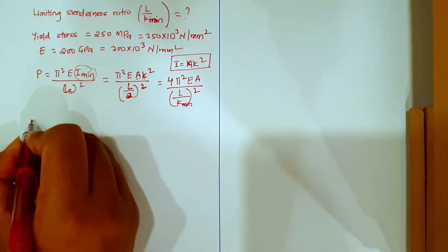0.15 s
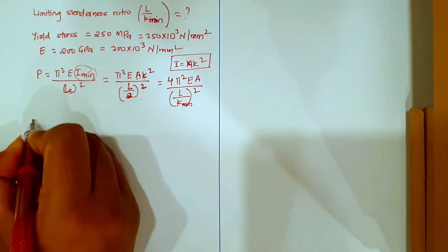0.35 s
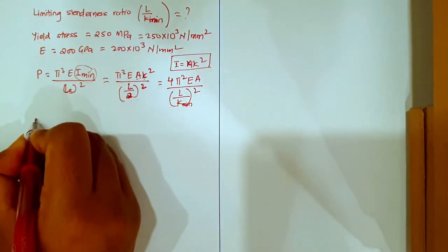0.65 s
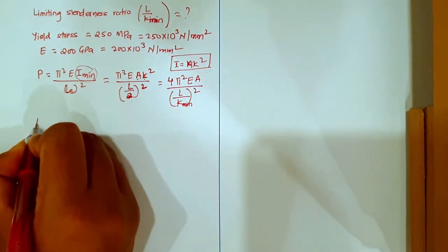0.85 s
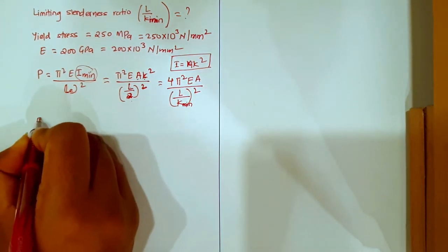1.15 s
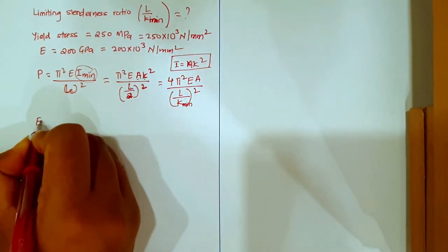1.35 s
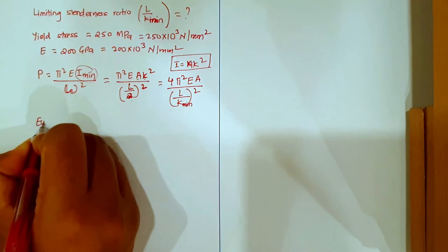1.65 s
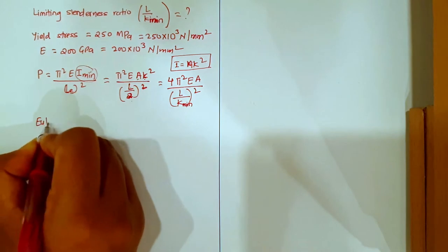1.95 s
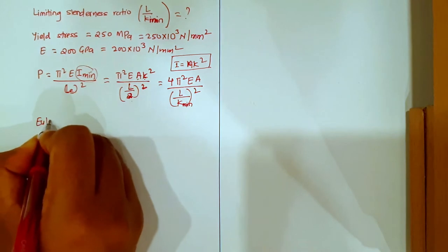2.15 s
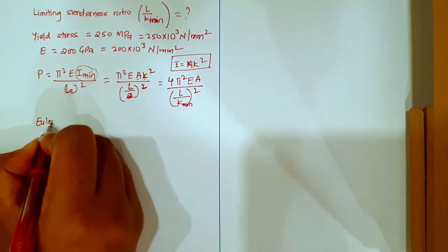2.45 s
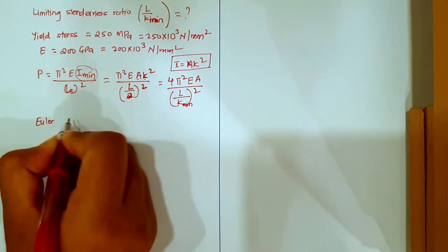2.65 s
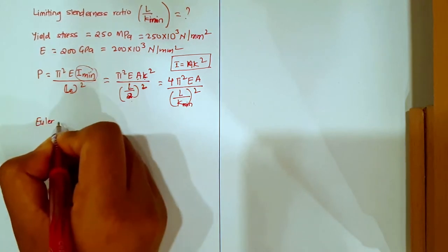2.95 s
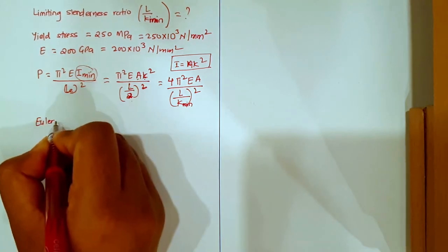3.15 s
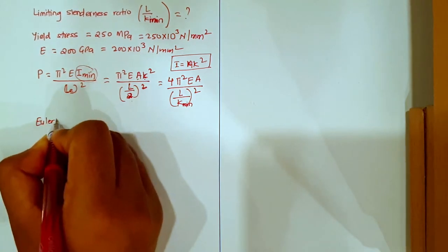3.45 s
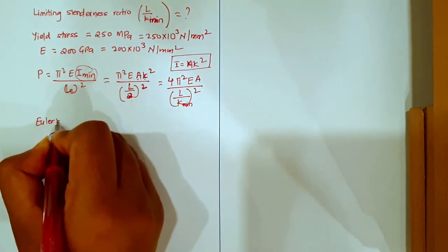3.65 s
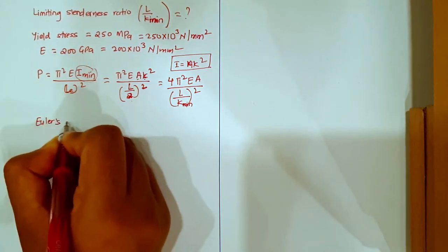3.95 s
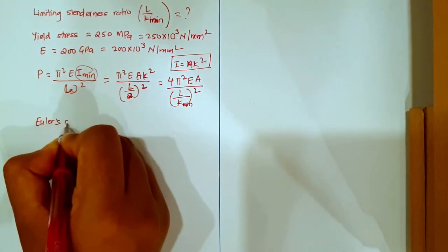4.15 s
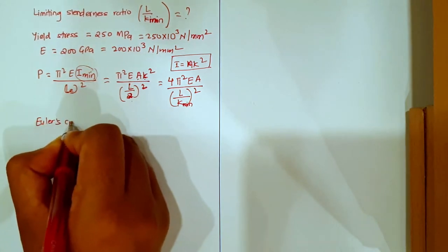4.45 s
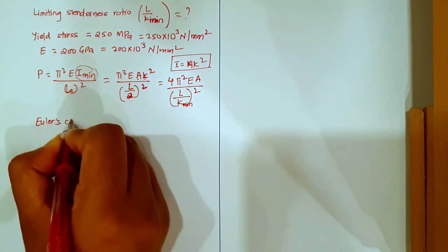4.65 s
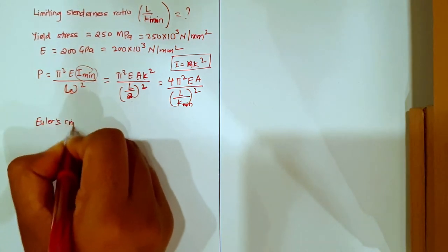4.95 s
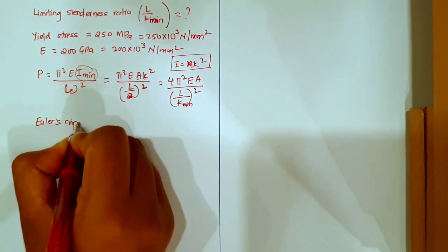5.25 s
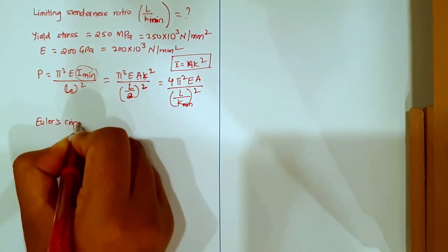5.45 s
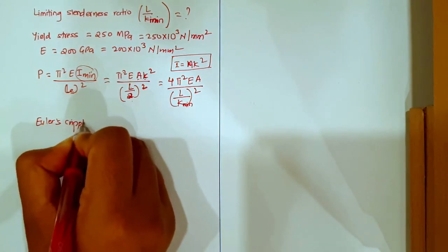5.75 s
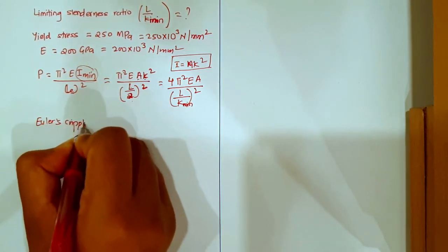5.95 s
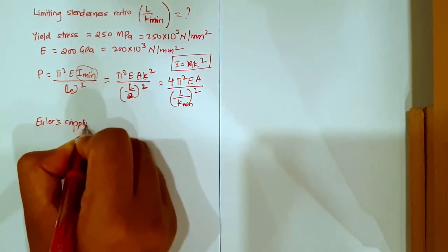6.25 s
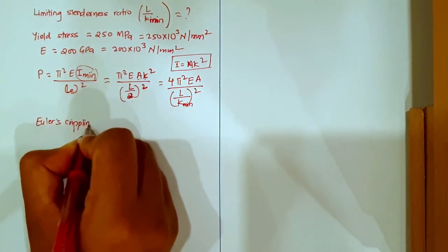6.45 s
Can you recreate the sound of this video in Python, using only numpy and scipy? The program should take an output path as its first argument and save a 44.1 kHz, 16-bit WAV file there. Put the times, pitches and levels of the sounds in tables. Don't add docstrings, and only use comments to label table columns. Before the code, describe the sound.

A ball pen taps and scratches short letters on a paper pad over a low, wavering fan hum in a quiet room.

```python
import sys
import numpy as np
from scipy import signal
from scipy.fft import rfft, irfft
from scipy.io import wavfile

SR = 44100
rng = np.random.default_rng(int(sys.argv[2]) if len(sys.argv) > 2 else 0)


def magnitude_from_level(level_db):
    exponent = np.asarray(level_db, float) / 20
    return 10 ** exponent


def store_wav(level_fs):
    pcm = np.round(np.clip(np.atleast_2d(level_fs), -1, 1) * 32767)
    wavfile.write(sys.argv[1], SR, pcm.T.astype(np.int16))


N = 291060


def rms_one(x):
    return x / np.sqrt(np.mean(x ** 2) + 1e-20)


def in_time(rows):
    s, *columns = np.transpose(rows)
    return [np.interp(np.arange(N) / SR, s, c) for c in columns]


def over_hz(rows):
    hz, *columns = np.transpose(rows)
    grid_hz = np.arange(N // 2 + 1) * SR / N
    return [np.interp(np.log(grid_hz + 1), np.log(hz), c) for c in columns]


def drift(rate_hz):
    r = np.exp(-80 * np.pi * rate_hz / SR)
    noise = rng.standard_normal(N // 40 + 2002)
    slow = signal.lfilter([1], [1, -2 * r, r * r], noise)[2000:]
    return np.interp(np.arange(N) / 40, np.arange(len(slow)), rms_one(slow))


def resonate(x, hz, width_hz):
    r = np.exp(-np.pi * width_hz / SR)
    zeros = np.array([1, 0, -1]) * (1 - r * r) / 2
    poles = [1, -2 * r * np.cos(2 * np.pi * hz / SR), r * r]
    return signal.lfilter(zeros, poles, x + 1e-18)


def lagged(pair, lag_s=0.0002977):
    late = np.interp(np.arange(N) - lag_s * SR, np.arange(N), pair[1])
    return np.array([pair[0], late])


def tone(hz, wander_hz, flutter_db):
    phase = 2 * np.pi * np.cumsum(hz + wander_hz * drift(2.584)) / SR
    return rms_one(np.sin(phase) * magnitude_from_level(flutter_db * drift(2.0)))


def swells(s, half_s, db):
    t = np.arange(0, N / SR + .002, .002)
    distance = (t - np.c_[s]) / np.c_[half_s]
    bells = magnitude_from_level(np.c_[db] - 12 * np.minimum(distance ** 2, 20)).sum(axis=0)
    return np.interp(np.arange(N) / SR, t, bells)


# frequency in Hz, left and right level in dB per Hz,
# likeness of the two ports [0-1].
ROOM_FLOOR = [(31.2, -19, -28, 0.2), (83.8, 14, 12, 0.63), (210, -6.5, -5, 1), (300, -5.5, -17, 1),
              (426, -17, -15.5, 1), (640, -24.5, -29.5, 1), (910, -23.5, -23.5, 0), (1130, -49, -36, 0.1),
              (2500, -35.5, -42, 0), (5100, -41.5, -38.5, 0), (7700, -49.5, -56, 0), (11180, -38, -38, 0.1),
              (14400, -39.5, -38.5, 0.7)]


def room_noise():
    left_db, right_db, alike = over_hz(ROOM_FLOOR)
    alike = np.clip(alike, 0, 1)
    mid, side = rfft(rng.standard_normal((2, N)))
    pair = np.sqrt(1 + alike) * mid + np.sqrt(1 - alike) * side * [[1], [-1]]
    noise = rms_one(irfft(pair * magnitude_from_level([left_db, right_db]), N))
    return magnitude_from_level(13.5) * lagged(noise)


# frequency in Hz, level in dB per Hz.
AIR_WHISTLE = [(800, -55), (1100, -20), (1300, -13.5), (1550, -6.5), (1780, -2), (2000, -7), (2200, -14),
               (2400, -22.5), (2900, -47)]


def air_stream():
    colour = magnitude_from_level(over_hz([(400, -44)] + AIR_WHISTLE + [(5000, -64)])[0])
    whoosh = rms_one(irfft(rfft(rng.standard_normal(N)) * colour, N))
    return whoosh * magnitude_from_level(.6 * drift(15)) * magnitude_from_level([[-35], [7]])


BUZZ_HZ = 99.95
# time in seconds, beats gone by.
FAN_SLIP = [(-.295, -1), (2.99, 8), (4.14, 11), (6.86, 19)]
# time in seconds, level in dB.
SECOND_ORDER = [(0, -41), (.8, -43), (1.6, -48), (2.7, -37.5), (3.4, -41), (4.0, -53.5), (4.6, -54),
                (5.2, -40), (5.9, -49), (6.6, -58)]


def beating(gain):
    turns, beats = BUZZ_HZ * np.arange(N) / SR, in_time(FAN_SLIP)[0]
    buzz, second, side = [np.sqrt(2) * np.sin(2 * np.pi * (turns - k * beats)) for k in range(3)]
    level = magnitude_from_level(in_time(SECOND_ORDER)[0] + 2.7 * drift(3.3))
    buzz_level = gain * magnitude_from_level(12.5 + 1.5 * drift(3.5))
    return buzz_level * buzz + level * (second + magnitude_from_level(-12) * side)


# multiple of the buzz, multiple of the fan turn, dB over the air stream.
MOTOR_TONES = [(0, 3, -2), (1, 1, 0), (0, 4, 2), (2, 0, 2), (1, 3, -1), (0, 6, 1), (1, 4, -9)]
# time in seconds, level in dB.
SIXTH_ORDER = [(0, -1), (.9, 1), (1.1, -16), (1.35, -2), (2.9, 1.5), (4.3, 1), (4.65, -13.5), (5.05, 6),
               (5.8, -3), (6.6, 1.5)]


def motor(gain):
    turns = BUZZ_HZ * np.arange(N) / SR
    fan = (turns - in_time(FAN_SLIP)[0]) / 2
    out = 0
    for buzz_multiple, fan_multiple, db in MOTOR_TONES:
        level_db = db + 2.5 * drift(3.0)
        if fan_multiple == 6:
            level_db = level_db + in_time(SIXTH_ORDER)[0]
        cycles = buzz_multiple * turns + fan_multiple * fan + rng.random()
        out = out + magnitude_from_level(level_db) * np.sin(2 * np.pi * cycles)
    return gain * magnitude_from_level(-0.5) * np.sqrt(2) * out


# middle and half length in seconds, level in dB.
CASE_BOOMS = [(.5, .15, -55), (0.846, 0.18, -43.5), (1.427, 0.2, -38), (1.71, .12, -39),
              (2.004, 0.088, -32), (2.493, 0.31, -42), (2.87, 0.13, -41.5), (3.354, 0.11, -35.5),
              (3.917, 0.33, -38), (4.355, 0.17, -38), (4.88, 0.071, -37), (5.155, 0.082, -53),
              (5.56, 0.36, -40.5), (5.967, 0.13, -36.5), (6.457, 0.17, -36)]
# middle and half length in seconds, level in dB.
THIRD_ORDER = [(0.19, 0.11, -49), (0.713, 0.18, -53), (1.35, 0.22, -57), (1.95, 0.053, -42),
               (2.856, .14, -41), (3.565, 0.049, -44), (3.932, 0.11, -42), (4.317, 0.094, -46),
               (4.61, 0.058, -52), (4.905, 0.033, -44.5), (5.168, .09, -48.5), (5.77, 0.12, -45),
               (6.52, 0.099, -52)]
# time in seconds, level in dB.
DESK_HUM_LEVEL = [(0.0, -61), (0.15, -54), (2.13, -45.5), (2.79, -46), (2.87, -59), (2.96, -47),
                  (3.46, -62), (3.55, -50), (4.34, -46.5), (5.29, -46), (6.54, -43.5), (6.6, -39)]
# frequency and wander width in Hz, level in dB over the air stream.
UPPER_ORDERS = [(125.2, 17, -3.5), (194.9, 10, 3.5), (244.7, 9, 0), (287.4, 4.4, -2.5), (340.7, 6.6, -10)]


def hum(gain):
    fan_hz, boom_hz = 48.99, 76.43
    boom = swells(*np.transpose(CASE_BOOMS)) + gain * magnitude_from_level(2.5)
    third = swells(*np.transpose(THIRD_ORDER)) + gain * magnitude_from_level(0.5)
    out = boom * tone(boom_hz, wander_hz=2.497, flutter_db=6.5)
    out += beating(gain)
    out += third * tone(3 * fan_hz, wander_hz=2.32, flutter_db=4.0)
    for hz, width_hz, level_db in UPPER_ORDERS:
        out += gain * magnitude_from_level(level_db) * rms_one(resonate(rng.standard_normal(N), hz, width_hz))
    out += motor(gain)
    first = magnitude_from_level(in_time(DESK_HUM_LEVEL)[0]) * tone(fan_hz, wander_hz=0.38, flutter_db=1.5)
    return lagged(out * magnitude_from_level([[.4], [-.4]])) + lagged(first * magnitude_from_level([[-.6], [2.1]]), lag_s=0.0022)


# frequency and width in Hz, left and right level in dB.
DESK_MODES = [(399.4, 106, -1.5, -8.5), (533.5, 72, -2.5, 1), (590.6, 51.5, -0.5, -0.5),
              (662, 67, -9.5, -0.5), (725.5, 72, -9.5, -6), (834, 91, -8, -11), (1060, 147, -24.5, -12),
              (1280, 130, -22, -4.5), (1550, 270, -49, -6.5), (2143, 172, -46, -7), (2140, 630, -29, -12),
              (3460, 310, -40.5, -23)]


def desk(low, middle, upper, damping, sign, patchy_db=0):
    out = 0
    for k, (hz, width_hz, left_db, right_db) in enumerate(DESK_MODES):
        drive = low if hz < 620 else middle if hz < 1150 else upper
        drive = drive * magnitude_from_level(patchy_db * drift(9))
        ring = sign ** k * resonate(drive, hz, width_hz * damping)
        out = out + ring * magnitude_from_level([[left_db], [right_db]])
    return lagged(out, lag_s=0.00017)


# time in seconds, peak in dB, hardness in dB.
NIB_TAPS = [(0.84, -31.5, 7.5), (1.22, -34.5, 9.5), (1.397, -34, 2.5), (1.506, -44, 2), (1.602, -39.5, -4),
            (1.6915, -35, 5), (1.926, -24.5, 6), (2.143, -27.5, 3.5), (2.436, -37, 1), (2.704, -52, 18),
            (3.511, -24.5, 4.5), (3.696, -30.5, 0), (4.151, -35.5, -3), (4.351, -29.5, -9), (4.514, -38, 0),
            (4.759, -30, 2.5), (4.898, -25, 2.5), (4.9805, -30.5, -18), (5.116, -28.5, -7),
            (5.348, -25.5, -14), (5.554, -27, -4), (5.807, -25, 2.5), (6.016, -27.5, -14), (6.194, -26, -2),
            (6.312, -30.5, -7), (6.431, -39, 0)]


def taps():
    s, peak_db, hard_db = np.transpose(NIB_TAPS)
    at = np.round(s * SR).astype(int)
    blows, ticks = np.zeros(N), np.zeros(N)
    blows[at], ticks[at] = magnitude_from_level(peak_db), magnitude_from_level(peak_db + hard_db)
    ms = np.arange(290) / SR * 1000
    crest = np.exp(-((ms - 2.05) / .33) ** 2)
    crest -= .35 * np.exp(-((ms - 2.9) / .35) ** 2)
    crest -= .28 * np.exp(-((ms - 4.6) / .8) ** 2)
    dip = -.5 * np.exp(-((ms - 1.4) / 0.18) ** 2)
    pulse, sharp = signal.lfilter(crest, [1], blows), signal.lfilter(dip, [1], ticks)
    pulse = signal.sosfilt(signal.butter(1, 180, "high", fs=SR, output="sos"), pulse)
    direct = magnitude_from_level(1.0) * lagged((pulse + sharp) * magnitude_from_level([[.2], [-.2]]), lag_s=0.00023)
    return direct + magnitude_from_level(3.5) * desk(pulse, pulse, magnitude_from_level(16) * sharp, damping=0.94, sign=0.87)


def skids(hard_share):
    s, peak_db, hard_db = np.transpose(NIB_TAPS)
    starts = np.zeros(N)
    starts[(s * SR).astype(int)] = magnitude_from_level(peak_db + hard_share * hard_db)
    fade_db_per_s = 203
    return signal.lfilter([1], [1, -magnitude_from_level(-fade_db_per_s / SR)], starts + 1e-18)


def nib_down(lift_s, bite_s):
    t, share = np.arange(N) / SR, np.ones(N)
    for s, peak_db, _ in NIB_TAPS:
        near = slice(int((s - .08) * SR), int((s + .05) * SR))
        depth = np.clip((peak_db + 27.5) / 10, 0, 1)
        corners_s = [-2 * lift_s, -lift_s, .002, 0.00067 + bite_s]
        share[near] *= 1 - depth * np.interp(t[near] - s, corners_s, [0, 1, 1, 0])
    return share


# middle and half length in seconds, pressure in dB, speed as hiss in dB.
PEN_STROKES = [(0.975, 0.051, -51.5, -64.5), (1.086, 0.045, -64, -68.5), (1.598, .035, -59, -66.5),
               (1.687, 0.04, -51.5, -67), (1.772, 0.13, -61, -74.5), (2.028, 0.059, -49, -62),
               (2.313, 0.12, -60.5, -73), (2.432, 0.1, -54, -72), (2.611, 0.058, -53, -67.5),
               (3.562, .06, -65, -80), (3.8, 0.054, -64, -76), (3.934, 0.031, -53, -80),
               (4.04, .05, -66, -69.5), (4.24, 0.082, -55, -70), (4.429, 0.036, -51, -67),
               (4.526, 0.034, -48, -65), (4.638, 0.04, -55.5, -72), (4.782, .04, -70, -74.5),
               (4.944, 0.049, -45, -72), (4.988, .033, -36, -52.5), (5.052, .025, -54, -67.5),
               (5.199, 0.091, -54.5, -65.5), (5.443, 0.048, -37, -58), (5.673, 0.11, -61.5, -69),
               (5.902, 0.043, -43.5, -63), (6.08, 0.046, -54.5, -75), (6.198, 0.023, -47.5, -69),
               (6.348, 0.03, -65, -69), (6.454, 0.029, -41.5, -62.5), (6.59, 0.09, -54.5, -68.5)]
# middle and half length in seconds, hiss in dB.
HAND_SLIDES = [(.826, 0.0034, -66), (0.999, .006, -65), (1.27, 0.032, -78), (1.455, 0.024, -77),
               (1.697, .003, -59), (1.925, .006, -69), (2.763, 0.063, -58), (2.915, 0.057, -54),
               (3.513, .003, -71), (3.907, 0.03, -64.5), (4.772, 0.0052, -70)]
# time in seconds, share [0-1].
HAND_ON_PAD = [
    (.75, 0),
    (.85, 1),
    (2.95, 1),
    (3.02, 0),
    (3.46, 0),
    (3.52, 1),
]


def contact():
    s, half_s, press_db, speed_db = np.transpose(PEN_STROKES)
    rest = magnitude_from_level([[-73], [-71], [-82.5], [-82]]) * in_time(HAND_ON_PAD)[0]
    early, short_s = s - 0.27 * half_s, 0.87 * half_s
    drag_db = -53 + 0.75 * (press_db + 44.5)
    scratch_db = -16 + 0.4 * speed_db + 0.6 * press_db
    low = swells(early, short_s, press_db) + magnitude_from_level(-20) * skids(0)
    middle = swells(early, short_s, drag_db) + magnitude_from_level(-21) * skids(0.54)
    upper = swells(s, half_s, scratch_db) + magnitude_from_level(-46) * skids(0)
    hiss = swells(s, half_s, speed_db) + swells(*np.transpose(HAND_SLIDES))
    return rest + [low, middle, upper, hiss]


def fibres(per_s, spread_db):
    strength = magnitude_from_level(spread_db * np.minimum(rng.exponential(1, N), 4))
    catches = rng.random(N) < per_s / SR
    return rms_one(strength * rng.choice([-1, 1], N) * catches)


# frequency in Hz, left and right level in dB per Hz.
PAPER_HISS = [(1500, -3.5, -5), (2800, -1.5, -3), (4300, -13, -5), (5370, -1, -4), (7170, 0.5, -31),
              (8850, -2.5, -43), (10000, 0.5, -28), (14600, -4, -17)]


def strokes():
    low, middle, upper, brush = contact()
    down = nib_down(lift_s=0.044, bite_s=0.0023)
    slips = fibres(per_s=2200, spread_db=3.5) * magnitude_from_level(1.2 * drift(60)) * down
    scratch = fibres(per_s=3000, spread_db=3.5) * upper * magnitude_from_level(18.5 + 2.2 * drift(35)) * down
    drag = magnitude_from_level(21.5) * desk(slips * low, slips * middle * magnitude_from_level(4.5), scratch,
                            damping=0.65, sign=-1.0187, patchy_db=3.05)
    drag = signal.sosfilt(signal.butter(3, 3300, fs=SR, output="sos"), drag)
    grains = rfft([fibres(per_s=9800, spread_db=1.0), fibres(per_s=11000, spread_db=4.5)])
    colour = magnitude_from_level(over_hz([(710, -43, -49)] + PAPER_HISS))
    hiss = rms_one(irfft(grains * colour, N))
    return drag + hiss * brush * magnitude_from_level(1.0 + 1.1 * drift(40))


# time in seconds, level in dB.
RECORDER_GAIN = [(0.0, -60.5), (0.26, -60), (1.43, -59), (1.65, -56), (2.08, -55.5), (2.55, -55),
                 (4.34, -56), (4.56, -55.5), (5.02, -54.5), (6.19, -55.5), (6.6, -54)]


def scene():
    gain = magnitude_from_level(in_time(RECORDER_GAIN)[0])
    background = gain * (room_noise() + air_stream()) + hum(gain)
    return background + taps() + strokes()


# frequency in Hz, left and right share [0-1].
TREBLE_HOLES = [(3000, 0, 0), (4000, .06, .02), (5500, .05, .05), (6600, .14, .5), (8000, .26, .65),
                (9800, .08, .5), (11000, 0, .06), (14500, 0, .03)]


def starved(x):
    hz, _, frames = signal.stft(x, SR, nperseg=2048)
    holes_hz, *columns = np.transpose(TREBLE_HOLES)
    share = np.array([np.interp(hz, holes_hz, c) for c in columns])[:, :, None]
    chance = rng.random((2, len(hz) // 8 + 1, frames.shape[2] // 2 + 1))
    chance = chance.repeat(8, axis=1).repeat(2, axis=2)
    kept = chance[:, :len(hz), :frames.shape[2]] > share
    frames = frames * np.where(kept, 1 / np.sqrt(1 - share), .03)
    return signal.istft(frames, SR, nperseg=2048)[1][:, :N]


def roll_off(x):
    return signal.sosfilt(signal.butter(12, 15600, fs=SR, output="sos"), x)


def record(dry):
    cut = signal.sosfilt(signal.ellip(10, .5, 70, 14500, fs=SR, output="sos"), dry)
    mix = starved(cut)
    return roll_off(mix)


dry = scene()
out = record(dry)
store_wav(out)
```